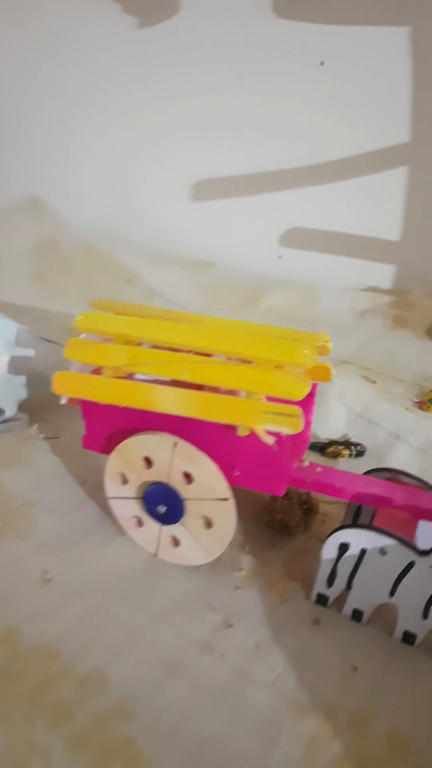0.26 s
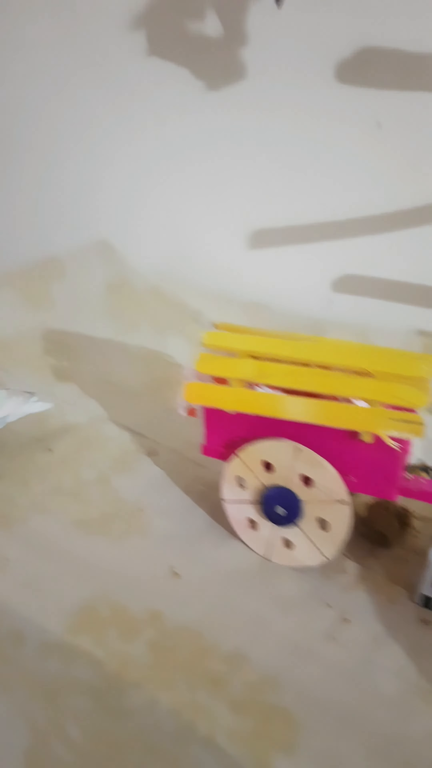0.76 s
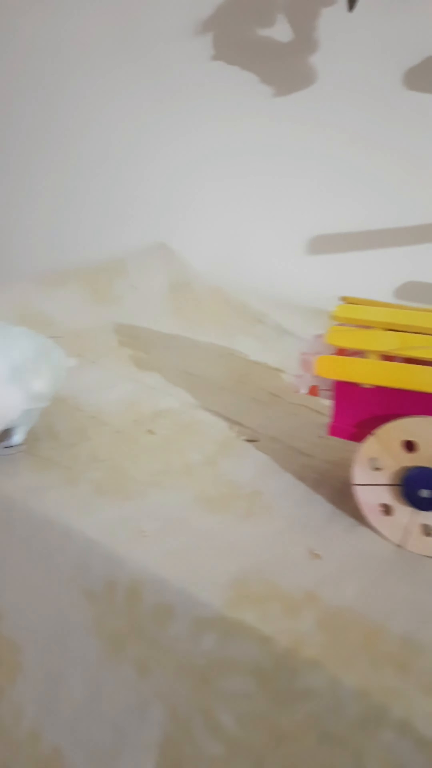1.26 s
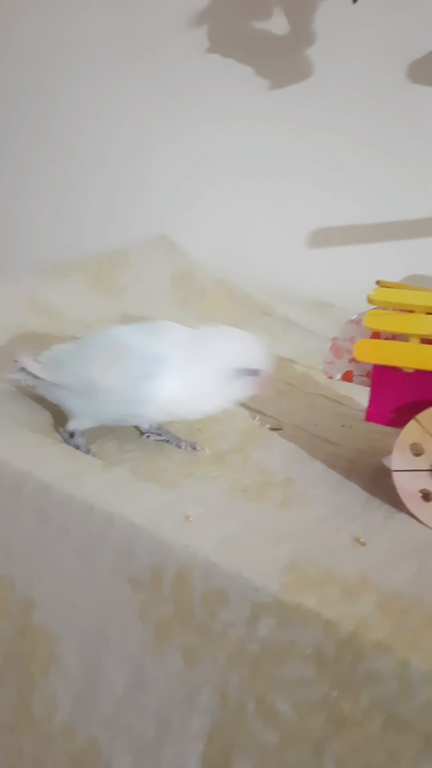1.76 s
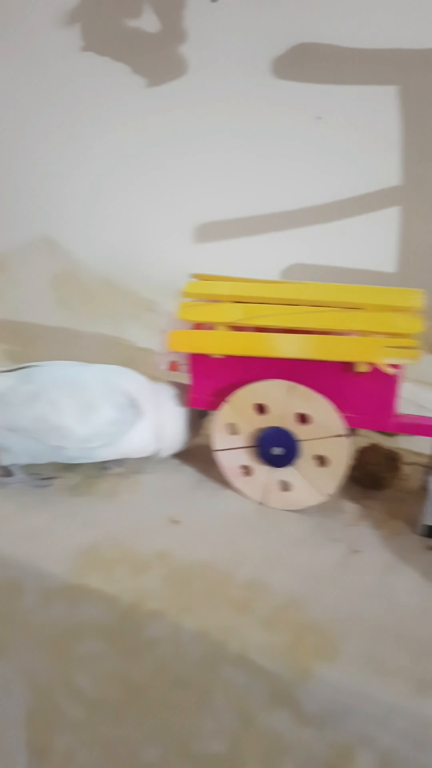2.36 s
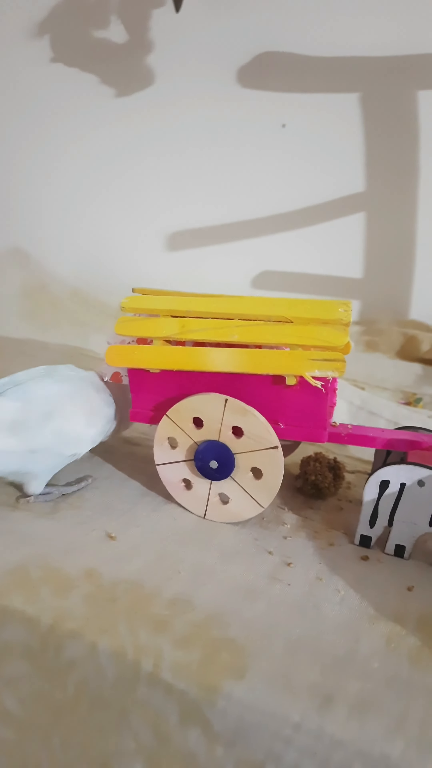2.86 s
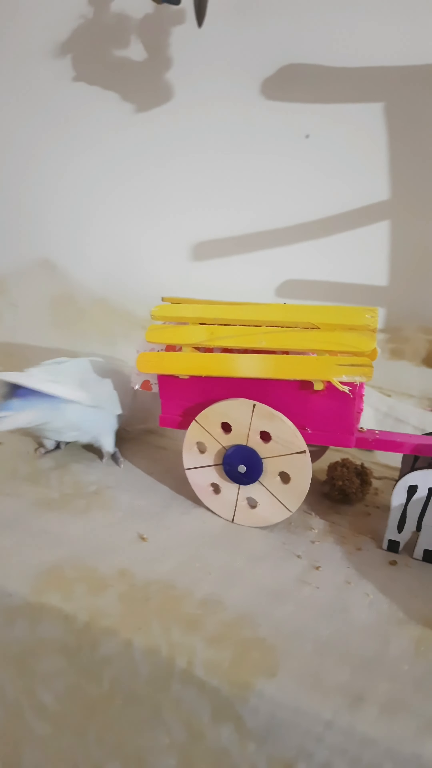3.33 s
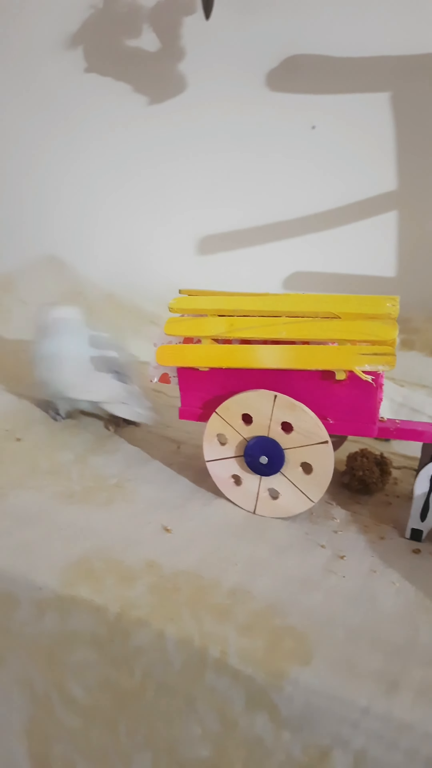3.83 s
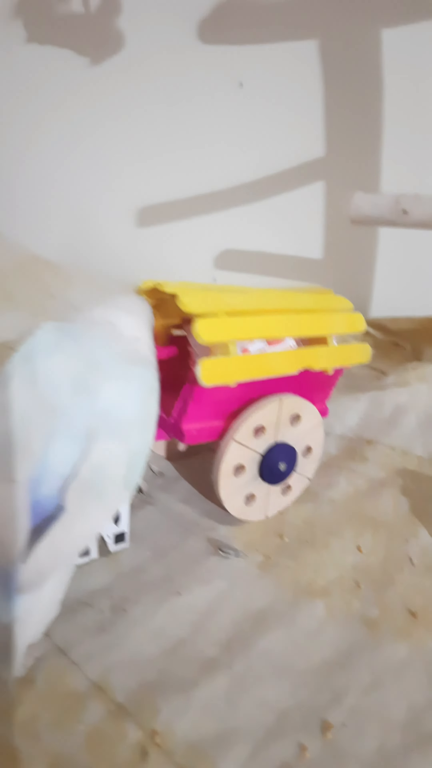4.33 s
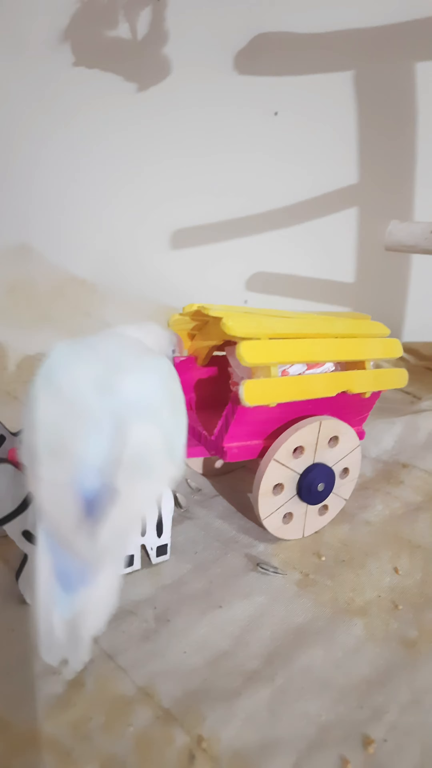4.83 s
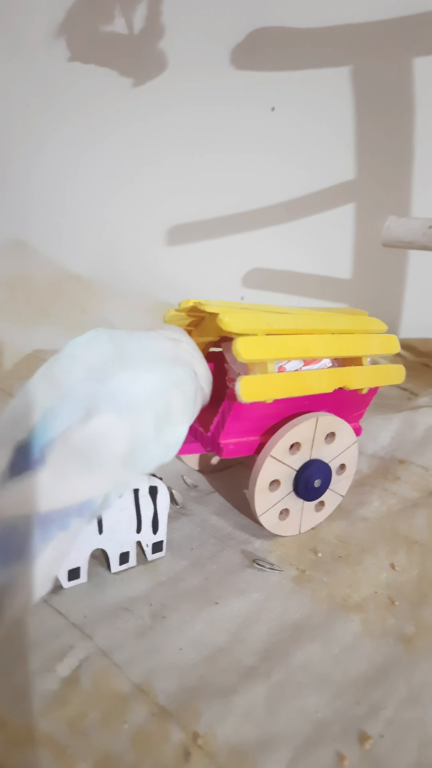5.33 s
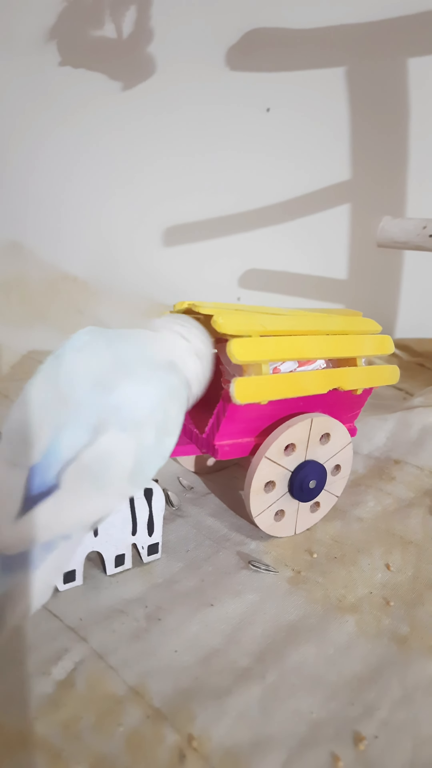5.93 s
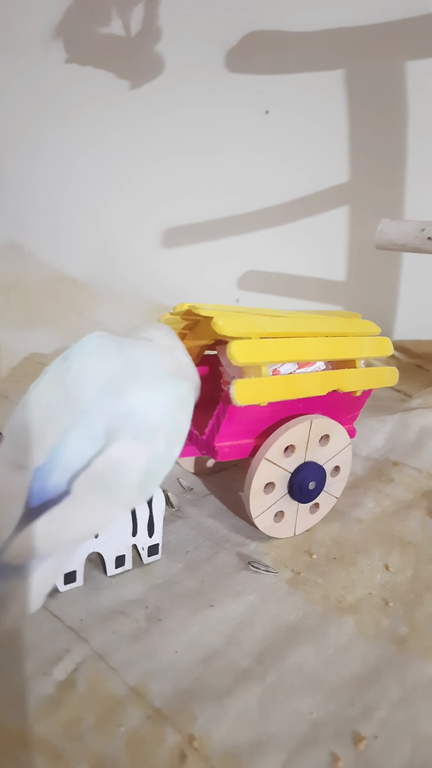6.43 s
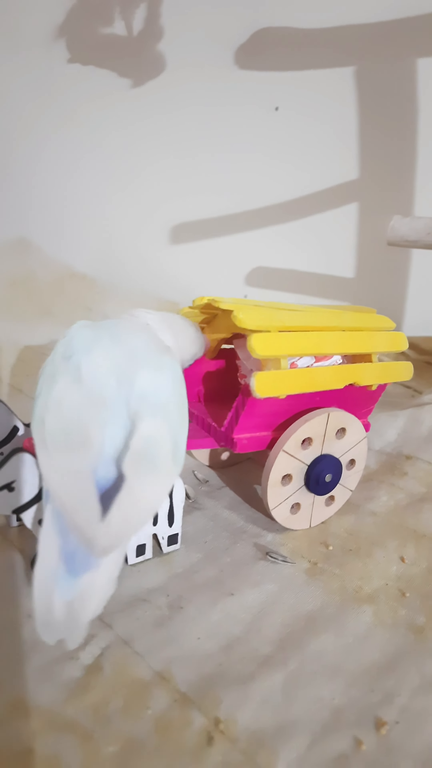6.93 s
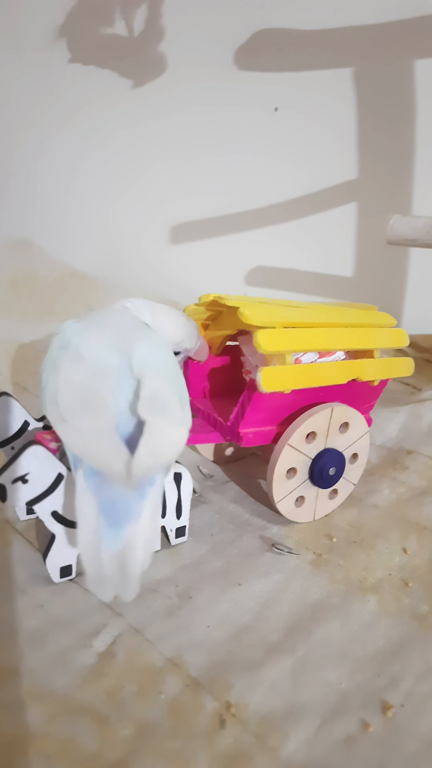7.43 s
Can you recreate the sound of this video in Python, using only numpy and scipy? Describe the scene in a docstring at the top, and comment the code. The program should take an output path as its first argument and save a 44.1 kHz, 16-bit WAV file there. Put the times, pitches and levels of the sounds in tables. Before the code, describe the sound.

In a room with hard walls, a close microphone picks up a burst of shrill parrot whistles and rasps, slightly to the left. Quieter chirping follows from the right, and a beak cracks once on a wooden stick among rapid rising chirps. After an abrupt cut, a bird nibbles a stick toy with small clicks and scrapes and a few soft mutters. A low fan hum and slight handling rumble run throughout.

```python
"""Small parrots in a hard-walled room, heard from close by on a phone with two microphones.
A wash of room echo opens, with loud gliding whistles and dry rasps from the left. From 1.5 s the chatter is
further off to the right, with a run of quick rising chips and one sharp bite on a toy cart of wooden sticks.
At a cut near 4 s the sound drops out briefly, chopping off chatter and echo; beak ticks on the cart and soft
mutters follow. A fan hums underneath, and the hand on the phone adds a faint rumble."""
import sys
import numpy as np
from scipy import signal
from scipy.fft import rfft, irfft
from scipy.io import wavfile
from scipy.ndimage import map_coordinates

SR = 44100
rng = np.random.default_rng(int(sys.argv[2]) if len(sys.argv) > 2 else 0)


def bounce(signal):
    """Save signal as a 16-bit WAV file at the path given by the first command-line argument."""
    frames = np.transpose(np.atleast_2d(signal))
    limited = np.clip(frames, -1, 1)
    pcm = np.round(limited * 32767).astype(np.int16)
    wavfile.write(sys.argv[1], SR, pcm)


N = 339129
T = np.arange(N) / SR
CUT_S, TOP_HZ = 3.997, 16200  # time of the cut; upper limit of the phone

# breath in a hoarse note: (frequency [Hz], gain [dB])
BREATH = [(700, -23.5), (1300, -5.5), (3000, -6), (6000, 4), (12500, -7.5), (16000, -7)]
# whistled notes: (time [s], length [s], level [dB], crescendo [dB], start pitch [Hz], middle pitch [Hz],
# end pitch [Hz], octave over fundamental [dB], roughness [0-1])
WHISTLES = [ (0.013, 0.02, -22.5, 23, 2340, 2253, 2070, 8, 0.18),
            (0.039, 0.028, -19.5, 5, 2496, 3479, 3724, -2, 0.05),
            (0.072, .032, -24.5, -6, 3074, 3170, 3150, 7, 0.63),
            (0.165, 0.0073, -22.5, -9, 2785, 2480, 2460, 6, 0.42),
            (0.173, 0.0305, -15, -10, 2345, 3538, 3150, 1.5, 0.27),
            (0.207, 0.028, -18.5, 9.5, 3290, 3003, 2420, 4, 0.43),
            (0.230, 0.028, -14, -3.5, 4250, 4243, 4180, -16.5, 0.71),
            (0.345, 0.11, -32.5, 0.5, 4740, 3705, 1690, -28, 0.47),
            (0.655, .065, -50.5, -9, 1940, 1990, 2011, -25, 0.44),
            (0.800, 0.066, -52.5, -4.5, 1940, 1784, 1722, -11, .8),
            (0.920, 0.035, -57.5, -7, 1940, 1880, 1910, -9.5, 0.54),
            (1.007, 0.02825, -27, 26.5, 5960, 4054, 4416, -1.5, 0.37),
            (1.034, 0.0255, -22, 0, 4510, 4936, 5050, -20, 0.36),
            (1.068, 0.00607, -23, -5.5, 3420, 2600, 2500, -9, .2),
            (1.075, 0.0353, -25, -18, 4082, 4020, 3876, -11, 0.42),
            (1.099, 0.034, -27, -13.5, 3270, 2215, 1308, -17, .2),
            (1.143, 0.039, -29.5, 3, 3935, 3800, 4030, -20, 0.61),
            (1.600, 0.13, -52, 5, 1148, 1366, 1427, -8, .8),
            (1.793, 0.066, -44.5, 3, 1072, 1436, 1790, 1, 0.58),
            (1.793, .036, -36.5, 1, 5620, 4100, 3622, -19.5, 0.65),
            (1.830, 0.04, -37.5, 8, 4747, 3720, 2290, -16, 0.24),
            (1.880, 0.034, -42.5, -3, 2450, 2700, 3098, -14, 0.66),
            (2.000, .035, -52, -3, 1040, 1213, 1440, -18, 0.19),
            (2.033, 0.0936, -41.5, -0.5, 1715, 1893, 1996, -10, 0.24),
            (2.205, 0.033, -41, -11.5, 2760, 3059, 3055, -6, 0.54),
            (2.360, 0.13, -46.5, 11, 1220, 1108, 1037, -4, 0.12),
            (2.660, 0.084, -44.5, 3.5, 1605, 1643, 1760, -7, 0.45),
            (2.797, 0.0326, -36.5, -10, 5372, 5670, 5850, -27.5, 0.31),
            (2.915, 0.049, -43, -18.5, 2200, 2020, 2136, -20, 0.76),
            (3.116, .022, -37, -3, 4260, 4800, 5650, -17, 1),
            (3.200, 0.0233, -35, 3, 4726, 4520, 4510, -26.5, 0.84),
            (3.215, .06, -39, -9, 2250, 2400, 2087, -18, 0.65),
            (3.293, 0.0352, -41.5, 0, 2412, 1894, 2470, 0.5, .9),
            (3.350, 0.0685, -42.5, -10, 2188, 2264, 2210, -24.5, 0.8),
            (3.498, 0.031, -40.5, -8.5, 2694, 3029, 3016, -8, 0.12),
            (5.365, 0.0562, -57, -2, 1330, 1389, 1403, -9.5, .6),
            (5.629, .028, -46.5, -4, 914, 1053, 1397, -16, 1),
            (5.655, 0.119, -55, -3, 1682, 1636, 1435, -5, .65),
            (5.940, 0.061, -54.5, -1, 1482, 1334, 1247, -4.5, 0.99),
            (6.545, 0.065, -54.5, -1.5, 1234, 1240, 1454, -5.5, 0.66), ]


def whistle(length, db, crescendo_db, start_hz, middle_hz, end_hz, octave_db, rough,
            jitter=0.076, third_db=-15, fourth_db=-19, hiss_db=-15, brighten=.26):
    """The syrinx bends one note through an arc; hoarseness shakes its pitch and strength and adds air."""
    n = int(length * SR)
    u = np.linspace(0, 1, n)
    arc = np.polyfit([0, .5, 1], np.log([start_hz, middle_hz, end_hz]), 2)
    hz = np.exp(np.polyval(arc, u))
    phase = 2 * np.pi * np.cumsum(hz * (1 + jitter * rough * wander(n, 900))) / SR
    effort_db = db + crescendo_db * (u - .5)
    first_db = effort_db - 10 * np.log10(1 + undb(octave_db) ** 2)  # two lowest partials share the effort
    upper_db = effort_db + brighten * (effort_db + 25)  # soft notes are purer
    levels = [first_db, first_db + octave_db, upper_db + third_db, upper_db + fourth_db]
    tone = sum(undb(g) * np.sin(k * phase) * (k * hz < TOP_HZ) for k, g in enumerate(levels, 1))
    air = undb(hiss_db + effort_db) * rough * unit(colour(rng.standard_normal(n), BREATH))
    flutter = 1 + .55 * rough * wander(n, 450)
    attack, release = u / .13, (1 - u) / .22
    envelope = np.sin(np.pi / 2 * np.clip(np.minimum(attack, release), 0, 1))
    return (np.sqrt(2) * tone * flutter + air) * envelope


# run of chips, off to the right: (time [s], level [dB], centre pitch [Hz])
CHIPS = [(2.333, -46, 3485), (2.388, -40.5, 3654), (2.447, -34.5, 4199), (2.508, -34, 3900),
         (2.578, -37, 3970), (2.656, -37.5, 3930), (2.722, -31.5, 3930), (2.785, -33, 4150),
         (2.838, -38, 4116), (2.897, -34.5, 4340), (2.959, -37, 3896)]


def chip(db, hz, low_db=-9, high_db=-13, peak_s=0.01, rasp_db=-3.5, tone_db=-1, hiss_db=-11.5):
    """A fast upward flick of pitch, strongest in its second harmonic, with a rasp and a puff of air."""
    throat = rasp(.014, db + rasp_db, hz)
    n = len(throat)
    t = np.linspace(-1, 1, n) * n / SR / 2
    octaves = rng.uniform(.3, .55)  # reach either side of the centre
    glide = hz * 2 ** (octaves * np.tanh(t / .007)) * (1 + .033 * wander(n, 1100))
    phase = 2 * np.pi * np.cumsum(glide) / SR
    upper = np.sin(3 * phase / 2) + np.sin(2 * phase)
    tone = np.sin(phase) + undb(low_db) * np.sin(phase / 2) + undb(high_db) * upper
    flick = unit(tone * np.exp(-(t / peak_s) ** 2))
    puff = unit(colour(rng.standard_normal(n), [(3000, -20), (7000, 1), (15000, 0)]))
    return throat + undb(db) * (undb(tone_db) * flick + undb(hiss_db) * puff) * swell(n, 0.0036)


# throat resonance: (frequency [multiple of the centre], gain [dB])
THROAT = [(0.239, -17.5), (.42, -6), (0.718, 0), (1.08, 0), (1.5, -2.5), (2.3, -15), (3.7, -23.5)]
# first row, the opening wash of room echo; the rest, dry rasps:
# (time [s], nominal length [s], level [dB], centre [Hz], treble [dB])
WASH_AND_RASPS = [(0.0, 0.087, -32, 4190, 4.5), (0.425, 0.0385, -35, 3286, -27),
                  (1.195, 0.043, -31.5, 4065, -1), (1.875, 0.0297, -42, 2553, 3.5),
                  (3.031, 0.105, -34, 4348, 2), (3.14, 0.076, -40.5, 3630, -8), (3.2, 0.081, -42, 3343, -5),
                  (3.29, 0.026, -43, 2820, -11), (3.345, 0.018, -38.5, 2700, -10),
                  (3.462, 0.0083, -46.5, 3240, 3), (3.49, 0.01, -41.5, 2950, 0),
                  (3.745, 0.035, -51.5, 2445, 3.5), (3.775, 0.015, -45.5, 2514, 0.5),
                  (3.83, 0.16, -62, 2358, 8), (5.635, 0.018, -51, 2458, 7), (5.885, 0.028, -59, 2060, 5.5),
                  (6.172, 0.00533, -48.5, 2730, 5), (6.527, 0.025, -57, 3400, 3)]


def rasp(length, db, hz, treble_db=0, pulse_hz=290, squeak_db=-6):
    """Uneven flaps of the syrinx chop air that rings the throat, with a broken squeak inside."""
    n = int((length + 0.0079) * SR)
    flap_phase = 2 * np.pi * np.cumsum(pulse_hz * (1 + 0.5 * wander(n, 293.3))) / SR
    flaps = np.exp(.55 * np.cos(flap_phase) + .25 * wander(n, 200))
    resonance = [(k * hz, g + treble_db * (k > 2)) for k, g in THROAT]
    air = unit(colour(rng.standard_normal(n) * flaps, resonance))
    squeak_phase = 2 * np.pi * np.cumsum(hz * (1 + 0.1375 * wander(n, 340.8))) / SR
    squeak = unit(flaps * np.sin(squeak_phase))
    return undb(db) * unit(air + undb(squeak_db) * squeak) * swell(n, 0.0042)


# colour the phone's microphones give the birdsong: (frequency [Hz], gain [dB])
MIC_COLOUR = [(800, -4.5), (1800, 1.5), (3200, -2), (4500, -1), (7000, -0.5), (9500, -2.5), (11800, -1.5),
              (15500, -5.5)]
# arrival at the left microphone after the right: (place [name], lag [samples])
LEFT_MIC_LAG = {"calls": -8, "chatter": 11, "mutters": 7, "cart": 10}


def birds(whistle_db=-2, chip_db=-1, rasp_db=2):
    """The first loud calls come from the left, the later chatter from the right and further off."""
    noises = undb(chip_db) * play(CHIPS, chip) + undb(rasp_db) * play(WASH_AND_RASPS, rasp, lead_s=.003)
    song = colour(noises + undb(whistle_db) * play(WHISTLES, whistle), MIC_COLOUR)
    first, late = T < 1.5, T > CUT_S
    calls = room(song * first, LEFT_MIC_LAG["calls"], wet_db=-5, early_db=-2, left_db=0.7)
    chatter = room(song * ~first * ~late, LEFT_MIC_LAG["chatter"], wet_db=-3.5, early_db=-.5, left_db=-3.83)
    mutters = room(song * late, LEFT_MIC_LAG["mutters"], wet_db=-6, early_db=-1.5)
    return (calls + chatter) * ~late + mutters  # the cut chops off chatter and echo


# modes of a wooden stick: (frequency [Hz], t60 [s], level [dB])
STICK_MODES = [(1852.5, 0.046, -33), (2354, 0.0546, -1.5), (3355, 0.01, -8), (4741, 0.0066, 5.5),
               (4970, 0.0091, 6), (7205, 0.012, -9)]
# beak on wood, close up: (time [s], level [dB], splinter treble [dB], wood body [dB])
BITES = [(2.2612, -18, -13, -3), (4.0354, -60, -14, -12), (4.9674, -45, 0, -23), (5.0324, -51, -11.5, -7.5),
         (5.1701, -36.5, -10.5, -23), (5.9424, -43.5, -30, -9), (6.0182, -34, -8, -20),
         (6.0965, -37, -12, -17.5), (6.1734, -40, -18, -21.5), (6.2134, -37, -10, -19.5),
         (6.2911, -47, -7.5, -20.5), (6.4998, -34, -5, -15), (6.9561, -54.5, -8.5, -3.5),
         (7.1034, -51.5, -8.5, -12.5), (7.1821, -50.5, -5, -19), (7.4709, -36.5, -14, -20)]


def bite(db, treble_db, body_db, crack_s=0.0013, crack_db=-2, ring_db=-8, crunch_db=-6, crunch_s=0.004):
    """A fibre snaps with a sharp crack, its neighbours crunch and the stick rings."""
    t = np.arange(SR // 16) / SR
    ring = sum(undb(g - 60 * t / t60) * np.sin(2 * np.pi * hz * (1 + 0.044 * rng.standard_normal()) * t)
               for hz, t60, g in STICK_MODES)
    crack = np.diff(rng.standard_normal(len(t) + 1)) * np.exp(-t / crack_s)
    crunch_colour = [(600, -35.5), (1300, -6.5), (2200, 8.5), (4500, 7), (7500, 5.5), (10000, -38)]
    crunch = unit(colour(rng.standard_normal(len(t)), crunch_colour)) * np.exp(-t / crunch_s)
    body = undb(ring_db) * ring + undb(crunch_db) * crunch
    return undb(db) * (undb(body_db) * body + undb(treble_db + crack_db) * crack)


def nibbles(per_s=9, db=-66, spread_db=3):
    """Rows of faint stray beak ticks between the firmer bites, after the cut."""
    times = rng.uniform(CUT_S, N / SR, int(per_s * (N / SR - CUT_S)))
    return [(s, db + spread_db * rng.standard_normal(), -8, -8) for s in times]


# colour of the crackle: (frequency [Hz], gain [dB])
SCRAPE_COLOUR = [(1000, -5), (2500, -4.5), (5500, -6.5), (8200, -3), (10000, -12.5), (13000, -4.5),
                 (16000, -12)]
# wood fibres tearing and feathers brushing: (time [s], nominal length [s], level [dB])
SCRAPES = [(.78, 0.287, -68), (1.97, 0.176, -57.5), (2.28, 1, -58.5), (4.96, 0.156, -72.5),
           (5.17, 0.08, -62), (5.65, 0.158, -62.5), (5.89, 0.4, -73), (6.4, 0.151, -69), (6.524, 0.02, -48),
           (6.56, 0.12, -60.5), (7.18, 0.1, -66.5)]


def scrape(length, db, grain_db=3, fade=0.8, uneven_db=3.5, release_share=0.32):
    """A dense, uneven crackle of tiny fibres that eases off as the beak slips."""
    n = int((length + 0.025) * SR)
    u = np.arange(n) / n
    sizes = undb(grain_db * np.minimum(rng.exponential(size=n), np.pi) + uneven_db * wander(n, 66.4))
    grains = rng.choice([-1, 1], n) * (rng.random(n) < .1) * sizes
    slip = np.exp(-fade * u) * np.minimum((1 - u) / release_share, 1)
    return undb(db) * unit(colour(grains * slip, SCRAPE_COLOUR)) * swell(n, 0.0082)


def chewing():
    """Bites and scrapes on the cart, close to the microphones and to the right."""
    wood = play(BITES, bite) + play(nibbles(), bite) + play(SCRAPES, scrape)
    return room(wood, LEFT_MIC_LAG["cart"], wet_db=-8, early_db=-8)


# decay between the hard walls: (frequency [Hz], t60 [s])
ROOM_T60 = [(500, 0.52), (2000, 0.92), (4000, 0.556), (8000, 0.47), (15000, 0.25)]


def room(x, lag, wet_db, early_db, left_db=0, build_s=0.0096):
    """Direct sound reaches the left microphone lag samples late; near walls and a diffuse tail follow."""
    t = np.arange(SR) / SR
    f = np.fft.rfftfreq(SR, 1 / SR) + 1
    hz, t60 = np.transpose(ROOM_T60)
    noise = rfft(rng.standard_normal((2, SR)))
    bands = [np.interp(np.log(f), np.log(hz), row) for row in np.eye(len(hz))]
    tail = sum(irfft(noise * band) * undb(-60 * t / decay) for band, decay in zip(bands, t60))
    tail *= 1 - np.exp(-t / build_s)
    early = rng.standard_normal((2, SR)) * (rng.random((2, SR)) < .02) * np.exp(-t / 0.016) * (t > .001)
    response = (undb(wet_db) * unit(tail) + undb(early_db) * unit(early)) / np.sqrt(SR)
    direct = np.array([np.roll(x, lag) * undb(left_db / 2), x * undb(-left_db / 2)])
    return direct + signal.fftconvolve(x[None], response, axes=1)[:, :N]


# fan motor lines: (frequency [Hz], level [dB], unsteadiness [0-1])
MOTOR_LINES = [(62.5, -60, 0.093), (122.6, -51, 0.9155), (131.9, -49.5, 0.25), (176.6, -72.5, 0.72),
               (236.8, -63, 0.94), (256.8, -67.5, 0.99)]
# air rushing from the fan: (frequency [Hz], gain [dB])
FAN_RUSH = [(30, -31), (50, -8.5), (90, -4.5), (190, -7), (290, 1), (370, -3), (450, -11.5), (650, -16),
            (1100, -19), (2000, -28), (4000, -42), (8000, -41.5), (10000, -46), (16000, -45)]
# slow swell, of which the fan follows a share: (time [s], level [dB])
FAN_SWELL = [(0.0, -42), (0.32, -48.5), (1.01, -50), (1.18, -45.5), (1.52, -48), (1.8, -44), (2.42, -45),
             (2.87, -41), (3.19, -46), (7.03, -45), (7.15, -47.5), (7.69, -46.5)]


def fan(rush_db=-50, wide_hz=520, swell_share=.7):
    """Wavering motor lines over rushing air; the bass is alike at both microphones."""
    hum = np.zeros(N)
    for hz, db, loose in MOTOR_LINES:
        waver = 1 + loose * (wander(N, 7) + 1j * wander(N, 7)) / np.sqrt(2)
        line = np.real(waver * np.exp(2j * np.pi * (hz * T + rng.random())))
        hum += undb(db) * np.sqrt(2 / (1 + loose ** 2)) * line
    mid, side = colour(rng.standard_normal((2, N)), FAN_RUSH)
    side = colour(side, [(100, -12), (wide_hz / 2, -11), (wide_hz, -2), (2000, -1)])
    rush = unit(np.array([mid + side, mid - side])) * undb(rush_db + wander(N, 14))
    swell_db = np.interp(T, *np.transpose(FAN_SWELL))
    return (hum + rush) * undb(swell_share * (swell_db - swell_db.mean()))


# hand moves, right at the microphones: (time [s], length [s], level [dB])
HAND_MOVES = [(0, .4, -53), (1.6, 2.5, -57.5)]


def handling(rest_db=-64.5, ease_s=0.11):
    """The hand shifts on the phone with a soft rumble while it follows the bird."""
    rumble_colour = [(25, -26), (70, -1.5), (130, 4.5), (260, -5),
                     (500, -18), (900, -11), (2000, -36), (8000, -63.5)]
    rumble = colour(rng.standard_normal((3, N)), rumble_colour)  # shared, left, right
    moves = play(HAND_MOVES, lambda length, db: undb(db) * swell(int(length * SR), ease_s))
    return unit(rumble[0] + 0.54 * rumble[1:]) * (undb(rest_db) + moves)


def undb(db):
    """Decibels to gain."""
    return 10 ** (np.asarray(db) / 20)


def unit(x):
    """Scale to rms 1."""
    return x / np.sqrt(np.mean(x ** 2) + 1e-20)


def colour(x, points):
    """Filter by (frequency [Hz], gain [dB]) points on a log-frequency axis."""
    hz, db = np.transpose(points)
    f = np.fft.rfftfreq(x.shape[-1], 1 / SR) + 1
    return irfft(rfft(x) * undb(np.interp(np.log(f), np.log(hz), db)), x.shape[-1])


def wander(n, rate):
    """Smooth random drift of spread near 1 that changes about rate times a second."""
    steps = np.arange(n) * rate / SR
    return map_coordinates(rng.standard_normal(int(steps[-1]) + 4), [steps + 1], order=2, mode="nearest")


def swell(n, edge_s):
    """A flat envelope with rounded ends."""
    t = np.arange(n) / SR
    return np.sin(np.pi / 2 * np.clip(np.minimum(t, t[::-1]) / edge_s, 0, 1)) ** 2


def play(table, voice, lead_s=0):
    """Sound every row of an event table, lead_s ahead of its time."""
    track = np.zeros(N)
    for s, *row in table:
        sound = voice(*row)
        i = max(int((s - lead_s) * SR), 0)
        track[i:i + len(sound)] += sound[:max(N - i, 0)]
    return track


def scene():
    """Birds, cart, fan and hand; the sound drops out briefly at the cut."""
    dropout = 1 - .9 * np.exp(-((T - CUT_S - .004) / .006) ** 4)
    return (birds() + chewing() + fan() + handling()) * dropout


def record(dry):
    """The phone cuts the treble above TOP_HZ."""
    return signal.sosfilt(signal.ellip(8, .2, 70, TOP_HZ, fs=SR, output="sos"), dry)


dry = scene()
out = record(dry)
bounce(out)
```